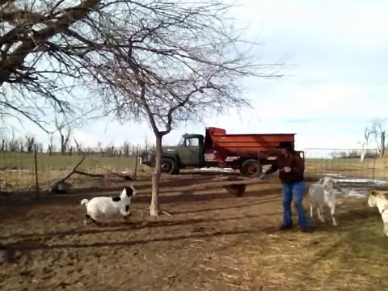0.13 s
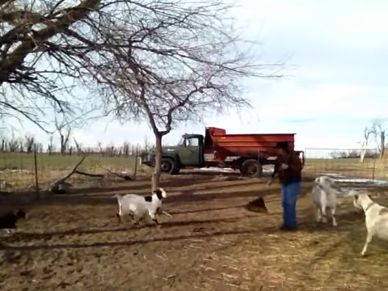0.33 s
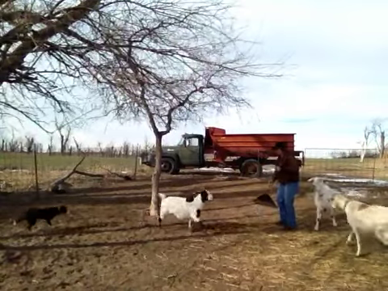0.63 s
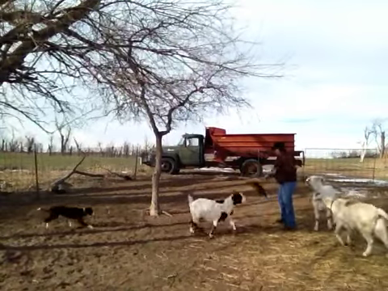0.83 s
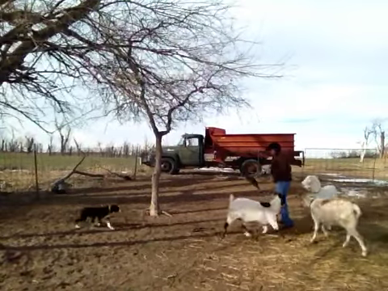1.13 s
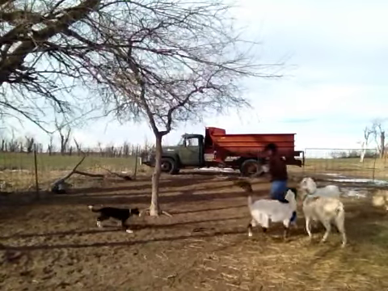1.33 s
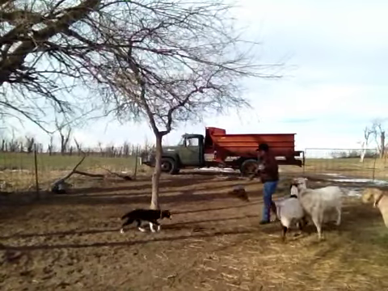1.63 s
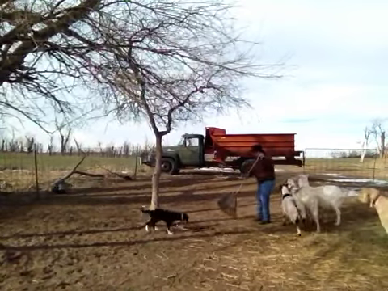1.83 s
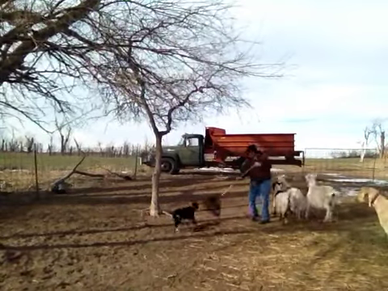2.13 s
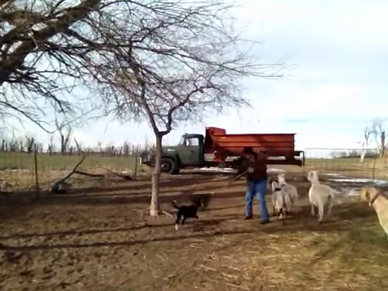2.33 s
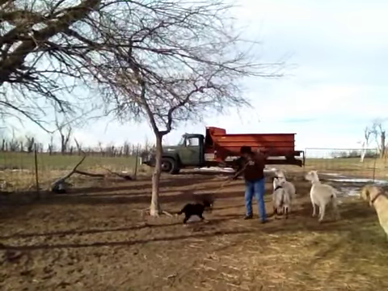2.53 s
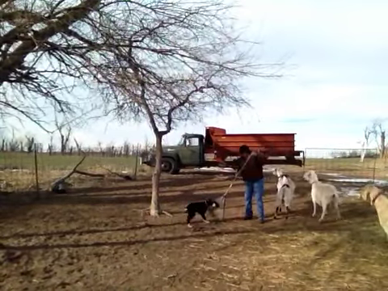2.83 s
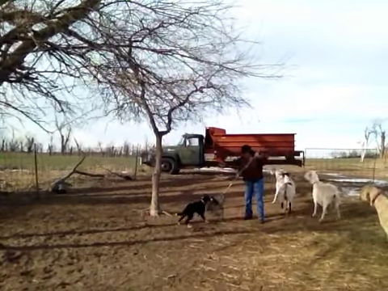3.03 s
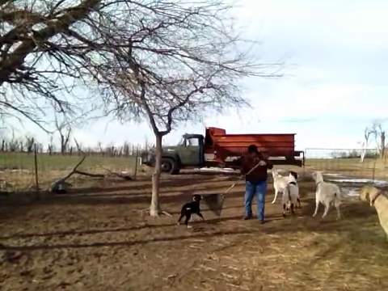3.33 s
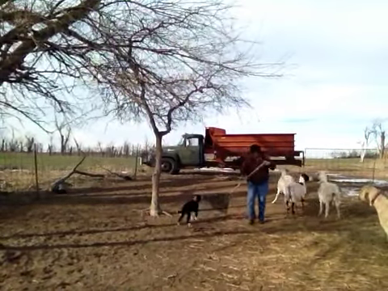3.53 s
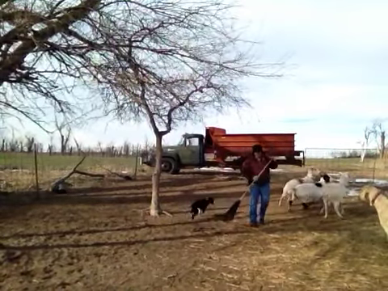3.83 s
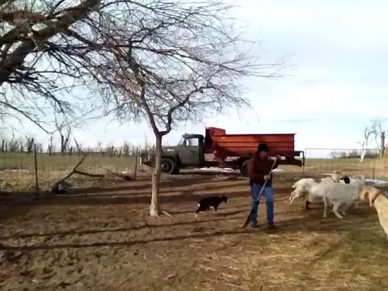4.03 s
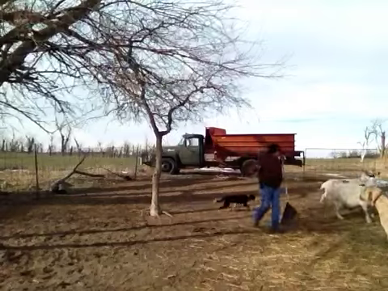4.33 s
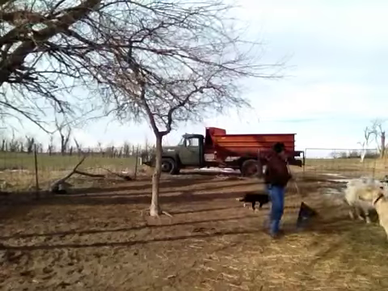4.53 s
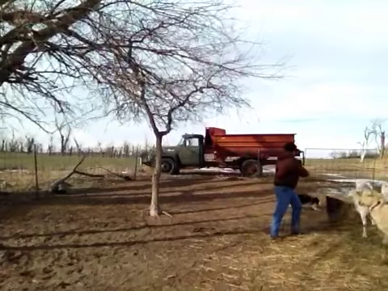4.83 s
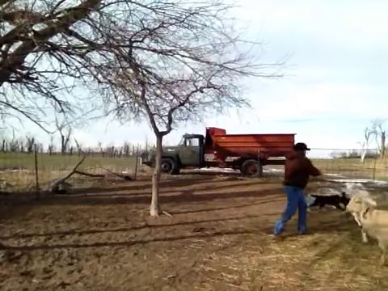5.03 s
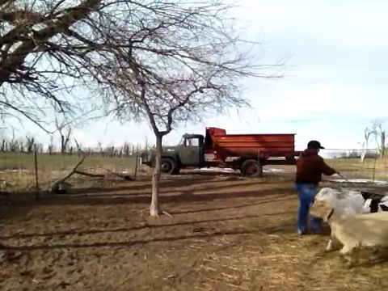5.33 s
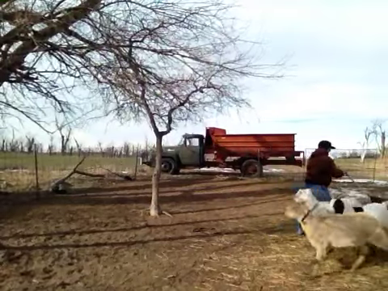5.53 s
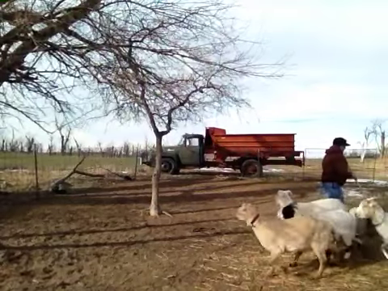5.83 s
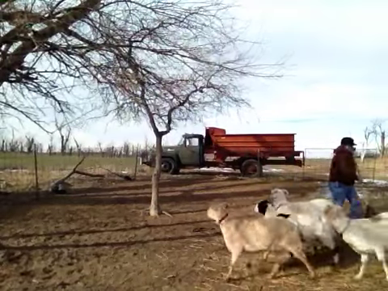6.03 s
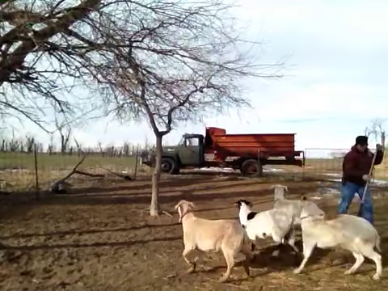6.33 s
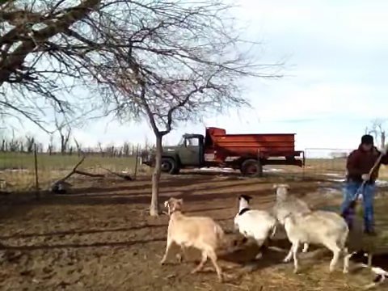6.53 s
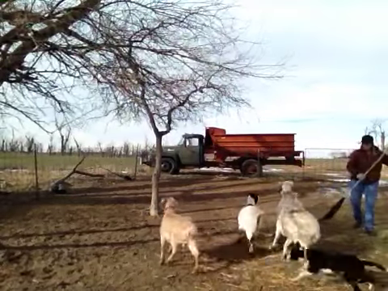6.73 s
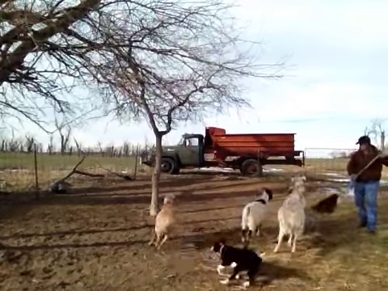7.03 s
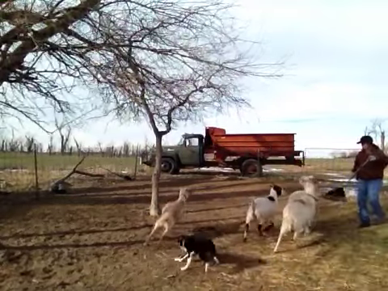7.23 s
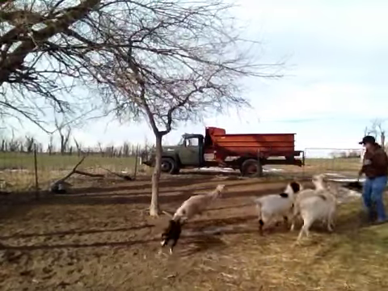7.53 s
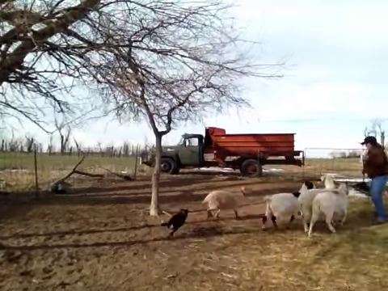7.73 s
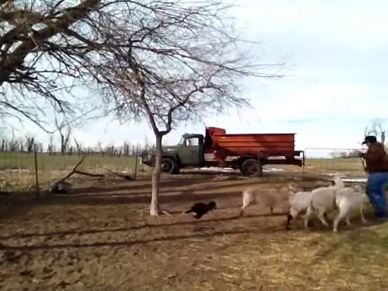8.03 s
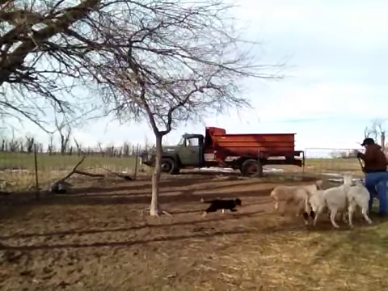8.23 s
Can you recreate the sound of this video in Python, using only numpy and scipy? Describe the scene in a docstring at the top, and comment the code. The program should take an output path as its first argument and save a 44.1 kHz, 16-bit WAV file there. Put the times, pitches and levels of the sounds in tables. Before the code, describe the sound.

Open-air hush and low, ragged wind run through the whole 8.4 seconds, gusts rumbling and fluttering on a single microphone. From the start, hooves rustle dry straw in bright crackles with scattered brittle snaps, including a sharp one near 2.1 s. Around 2.6 s a dull hoof scuff passes, then the straw thins and the wind briefly eases. From 3.2 to 3.8 s a bird gives five short, grainy rasps, followed by falling chirps at about 3.8 and 4.1 s, and a faint, thin whistle sliding down near 4.4-4.7 s. From 5.2 s the goats trot close: dense straw crackling, snaps, and gritty crunches on clods until about 7 s, with dirt scuffs around 6-7.2 s. The strongest gust slaps the microphone hard at 6.15 s. Trampling then lightens; a last faint whistle slides down around 7.4 s amid continuing wind and straw.

```python
"""Goats are herded round a dirt pen on a breezy day, heard through one microphone.
From the start, filtered noise gives open air and gusts, pressure pulses slap the microphone,
and showers of clicks make straw crackle and snap under the hooves. Hooves soon scuff dirt too.
Then a bird gives five rasps of grainy hiss, two falling chirps and a thin sliding whistle.
The herd trots close by, densest of all, and crunches clods; a last whistle slides down late on."""
import sys
import numpy as np
from scipy import signal
from scipy.fft import rfft, irfft, next_fast_len
from scipy.io import wavfile
from scipy.ndimage import uniform_filter1d

SR = 44100
rng = np.random.default_rng(int(sys.argv[2]) if len(sys.argv) > 2 else 0)


def wav_out(sig):
    """Save sig, one row per channel (or a flat mono array), as 16-bit PCM at SR to the path in sys.argv[1]."""
    wavfile.write(sys.argv[1], SR, np.round(np.clip(np.atleast_2d(sig).T, -1, 1) * 32767).astype(np.int16))


N = 369999
TIME = np.arange(N) / SR


def amp(db):
    """Level law: decibels to amplitude ratio."""
    return 10 ** (np.asarray(db) / 20)


def evened(x):
    """Normalization: scales a signal to rms 1."""
    return x / np.sqrt(np.mean(x ** 2) + 1e-20)


def curve(rows):
    """Linear interpolation: joins (t/s, value) rows by straight lines."""
    return np.interp(TIME, *np.transpose(rows))


def add(mix, s, sound):
    """Superposition: sums a sound into the mix from time s."""
    part = mix[max(round(s * SR), 0):][:len(sound)]
    part += sound[:len(part)]


def colour(x, spectrum, size=4096):
    """Minimum-phase filtering: a causal response of unit energy follows the shape of (f/Hz, level/dB) rows."""
    f, db = np.transpose(spectrum)
    hz = abs(np.fft.fftfreq(size, 1 / SR))
    log_gain = np.log(amp(np.interp(np.log(hz + 1), np.log(f), db)))
    # the Hilbert transform of the log gain supplies the minimum phase
    response = np.exp(np.conj(signal.hilbert(log_gain)))
    ring = np.fft.ifft(response).real[:size // 2]
    return signal.oaconvolve(x, ring / np.linalg.norm(ring))[:len(x)]


def wander(rate_hz):
    """Random modulation: noise of rms 1 under a Gaussian low-pass, down to 1/e in amplitude at rate_hz."""
    size = next_fast_len(N, True)
    hz = np.fft.rfftfreq(size, 1 / SR)
    spectrum = rfft(rng.standard_normal(size)) * np.exp(-(hz / rate_hz) ** 2)
    return evened(irfft(spectrum, size)[:N])


def steadied(x, span_s):
    """Power regulation: keeps the fine grain of x but holds its sliding mean power near 1."""
    window = signal.windows.hann(int(span_s * SR))
    power = signal.oaconvolve(x ** 2, window / window.sum(), "same")
    return x / np.sqrt(abs(power) + 1e-9)


def swells(rows, rise):
    """Power addition of uncorrelated sources: Gaussian swells, 10 dB down at both ends of their length.

    rise is the share of the length spent building up."""
    power = np.zeros(N)
    for s, length, db in rows:
        near = slice(max(int((s - 2 * length) * SR), 0), int((s + 2 * length) * SR))
        u = (TIME[near] - s) / length
        side = np.where(u < 0, rise, 1 - rise)
        power[near] += amp(db - 10 * (u / side) ** 2) ** 2
    return power


def grains(per_s):
    """Shot noise: clicks of random sign at random moments, a few of them large."""
    size = amp(4 * np.minimum(rng.exponential(1, N), 2.5))
    sign = rng.choice([-1., 1.], N)
    return size * sign * (rng.random(N) < per_s / SR)


def focused(material, centre_hz):
    """Resonant emphasis: a material's spectrum fades per octave away from the piece's own brightest pitch."""
    slope_db = 11  # per octave
    return [(hz, db - slope_db * abs(np.log2(hz / centre_hz))) for hz, db in material]


# spectral shape of the open air: (f/Hz, level/dB)
AIR_SPECTRUM = [(30, -3), (200, 28), (600, 13.5), (1800, 0), (3000, -4.5), (4000, -10.5), (7500, -11.5),
                (9800, -20), (15500, -17.5)]


def air(level_db=-47.0, fade_db_per_s=0.61):
    """Broadband noise: the soft rush of open fields, its level easing linearly in decibels."""
    level = level_db - fade_db_per_s * (TIME - TIME.mean())
    return amp(level) * colour(rng.standard_normal(N), AIR_SPECTRUM)


# gusts that drive both eddy sizes: (peak t/s, length t/s, driving level/dB)
GUST_ROWS = [(0.075, 0.26, -31), (0.522, 0.14, -25), (0.631, 0.064, -22.5), (0.69, 0.13, -23),
             (0.88, 0.52, -26), (1.168, 0.081, -25), (1.421, 0.25, -22), (1.412, 0.043, -21.5),
             (1.473, 0.044, -20.5), (1.587, 0.28, -28.5), (1.735, 0.082, -25.5), (1.844, 0.18, -24.5),
             (1.985, 0.1, -24), (2.092, 0.14, -29), (2.212, 0.093, -31), (2.508, 0.023, -28),
             (2.599, 0.19, -28), (2.794, 0.067, -25.5), (3.0, 0.96, -38.5), (3.412, 0.024, -32),
             (3.713, 0.29, -31), (3.883, 0.16, -25), (4.022, 0.07, -24.5), (4.121, 0.12, -30),
             (4.312, 0.11, -25.5), (4.53, 0.5, -25.5), (4.517, 0.049, -25), (4.708, 0.037, -24),
             (4.79, 0.088, -27.5), (4.92, 0.88, -33), (5.081, 0.05, -21), (5.382, 0.13, -30),
             (5.599, 0.21, -24), (5.809, 0.18, -23), (6.075, 0.34, -20.5), (6.172, 0.086, -17.5),
             (6.291, 0.23, -27.5), (6.515, 0.16, -33), (6.641, 0.029, -26.5), (6.94, 0.48, -31),
             (7.27, 0.22, -25.5), (7.541, 0.27, -30), (7.67, 0.17, -27), (7.718, 0.029, -21.5),
             (7.861, 0.22, -27.5), (8.005, 0.087, -25), (8.13, 0.4, -27.5)]
# spectral shape of the large rumbling eddies: (f/Hz, level/dB)
BUFFET_SPECTRUM = [(50, -61), (75, -22.5), (105, -10.5), (145, -1), (185, 1), (270, -7), (420, -18.5),
                   (700, -36), (2500, -76), (6000, -78)]
# spectral shape of the small ragged eddies: (f/Hz, level/dB)
FLUTTER_SPECTRUM = [(60, -52.5), (160, 6), (300, 8), (560, -4.5), (1300, -26), (2500, -45), (6000, -59.5)]
# extra level of the ragged flutter, highest in the gusts from about 2.6 to 4.3 s: (t/s, level/dB)
FLUTTER_TRIM = [(1.5, 1), (2.6, 3.5), (4.3, 2.7), (5.6, 0.5)]


def wind(breeze_db=-41, body_growth=0.88, flutter_db=-38.0, flutter_growth=1.4, lumpy_db=3.0, ragged_db=4.5):
    """Turbulent pressure: large eddies rumble; small ones grow faster with the gust and brighten it.

    Growths are in dB per dB of gust; the breeze is a steady driving power under the gusts."""
    gust_db = 10 * np.log10(amp(breeze_db) ** 2 + swells(GUST_ROWS, rise=.42))
    surge_db = gust_db - gust_db.mean()
    lumps = wander(rate_hz=42.0)

    body = steadied(colour(rng.standard_normal(N), BUFFET_SPECTRUM), span_s=.05)
    body = steadied(body * amp(lumpy_db * lumps), span_s=.28)
    rumble = body * amp(gust_db.mean() + body_growth * surge_db)

    churn = 2 * np.tanh(evened(lumps + wander(rate_hz=92)) / 2)  # soft limit on the raggedness
    ragged = rng.standard_normal(N) * amp(ragged_db * churn)
    flutter = steadied(colour(ragged, FLUTTER_SPECTRUM), span_s=.07)
    return rumble + flutter * amp(flutter_db + flutter_growth * surge_db + curve(FLUTTER_TRIM))


# spectral shape of dry straw, shared by rustle and snaps: (f/Hz, level/dB)
STRAW_SPECTRUM = [(500, -32), (2200, -18), (3100, -2.5), (3900, -5.5), (5000, -0.5), (6200, -1.5),
                  (7400, 3.5), (10000, -5), (11700, 2.5), (15000, -0.5)]
# bustle of the herd on the straw, loudest as it trots close by: (t/s, level/dB before the trim)
BUSTLE_CURVE = [(0.0, -72.5), (1.1, -69.5), (2.4, -71.5), (2.9, -76.5), (4.2, -75), (5.16, -70),
                (5.24, -64.5), (6.7, -65.5), (7.3, -70.5), (8.38, -69.5)]
# heavier footfalls that crush the straw: (peak t/s, length t/s, level/dB before the trim)
FOOTFALL_ROWS = [(0.35, 0.037, -61.5), (1.39, 0.039, -59.5), (1.625, 0.088, -61.5), (4.625, 0.15, -66),
                 (5.225, 0.096, -57.5), (5.325, 0.057, -57), (5.48, 0.22, -60), (5.675, 0.028, -61),
                 (6.09, 0.12, -62.5), (6.515, 0.22, -62), (6.66, 0.084, -56.5), (6.83, 0.062, -62.5),
                 (7.81, 0.049, -65.5), (8.08, 0.072, -66)]


def straw(level_db=7.0, clump_db=4.5, step_db=2.0, still_db=-76.0, rub=.6, tick=.22):
    """Crackling noise: stalks of many sizes crackle and tick over a soft rub, swelling with each footfall."""
    crackle, ticks, t = np.zeros(N), np.zeros(N), np.arange(SR // 50) / SR
    for hz in np.geomspace(5000, 15000, 5):  # one brightest pitch per stalk size
        stalk = focused(STRAW_SPECTRUM, hz)
        clumps = amp(clump_db * wander(rate_hz=59))
        crackle += colour(grains(per_s=450) * clumps, stalk)
        crack = rng.standard_normal(len(t)) * np.exp(-t / .0007)
        ticks += colour(signal.oaconvolve(grains(per_s=10), crack)[:N], stalk)
    rubbing = rub * colour(rng.standard_normal(N), STRAW_SPECTRUM)
    rustle = (evened(crackle) + rubbing) * amp(step_db * wander(rate_hz=18))
    # bustle weaker than still_db adds nothing
    bustle_power = np.maximum(amp(2 * curve(BUSTLE_CURVE)) - amp(2 * still_db), 0)
    press = np.sqrt(bustle_power + swells(FOOTFALL_ROWS, rise=.29))
    return (steadied(rustle, span_s=.25) + tick * evened(ticks)) * press * amp(level_db)


# eddies that slap the microphone: (t/s, peak level/dB before trim and high-pass)
SLAP_ROWS = [(0.075, -15), (4.559, -15.5), (5.094, -13), (6.148, -1.5), (6.282, -10), (7.688, -10),
             (8.015, -12.5)]


def slaps(width_s=0.00053, level_db=-6.0):
    """Pressure pulse: an eddy crossing the port makes a quick rounded dip, then its rebound."""
    out, t = np.zeros(N), np.arange(-SR // 100, SR // 100) / SR
    u = t / width_s
    push = np.sin(u) / np.cosh(u / 1.6) ** 2
    for s, db in SLAP_ROWS:
        add(out, s + t[0], amp(db + level_db) * push / push.max())
    return signal.sosfilt(signal.butter(2, 130, "highpass", fs=SR, output="sos"), out)


# stalks that snap under a hoof: (t/s, level/dB before the trim, brightest f/Hz)
SNAP_ROWS = [(0.3651, -39, 13900), (0.41, -39, 5590), (0.564, -34.5, 11000), (0.7248, -36.5, 11900),
             (0.7514, -36.5, 6250), (0.935, -38.5, 4460), (1.377, -37, 9500), (1.597, -34, 12000),
             (1.645, -38, 7310), (1.8685, -40, 9500), (1.94, -38, 11000), (2.082, -26.5, 14200),
             (4.947, -41, 11900), (5.067, -36, 6200), (5.213, -35, 12400), (5.6421, -36, 11300),
             (5.7233, -29, 11600), (5.839, -37, 7050), (5.866, -40, 8000), (5.943, -38, 6000),
             (6.022, -27, 8400), (6.676, -29, 11000), (6.684, -29, 10000), (6.742, -39, 8160),
             (7.159, -36.5, 7500), (7.2105, -39, 7450), (7.497, -30.5, 12100), (7.638, -49, 11900),
             (7.6943, -41, 7500), (7.744, -42, 11000), (8.061, -40, 8000), (8.275, -44, 7500)]


def snaps(level_db=-8.5, crack_s=0.0012, splinter_s=0.013, splinter=0.18):
    """Brittle fracture: a breaking stalk cracks in a fast-decaying burst with a few slower splinters."""
    out, t = np.zeros(N), np.arange(SR // 10) / SR
    for s, db, hz in SNAP_ROWS:
        splinters = splinter * np.exp(-t / splinter_s) * rng.exponential(1, len(t))
        burst = rng.standard_normal(len(t)) * (np.exp(-t / crack_s) + splinters)
        add(out, s, amp(db + level_db) * colour(burst, focused(STRAW_SPECTRUM, hz)))
    return out


def strokes(rows, spectrum, grain_db, grain_hz):
    """Amplitude modulation: short swells of hiss, grainy at random rates up to about grain_hz."""
    swell = np.zeros(N)
    for s, length, db in rows:
        add(swell, s - length / 2, amp(db) * signal.windows.tukey(int(length * SR), .8))
    grainy = rng.standard_normal(N) * amp(grain_db * wander(grain_hz))
    return swell * evened(colour(grainy, spectrum))


# spectral shape of dirt, shared by scuffs and clods: (f/Hz, level/dB)
DIRT_SPECTRUM = [(400, -28), (1500, 14), (3000, 11), (3900, 1.5), (5200, 2), (7600, 4), (15000, -5)]
# hooves scuffing dirt: (middle t/s, length t/s, level/dB, brightest f/Hz)
SCUFF_ROWS = [(2.635, 0.1, -62, 2780), (4.668, 0.12, -62, 3000), (5.96, 0.12, -57, 7000),
              (6.515, 0.069, -58, 6000), (6.98, 0.16, -55.5, 6000), (7.157, 0.15, -57, 7000)]


def scuffs():
    """Sliding friction: hooves drag through dirt, dull on packed ground and brighter on loose grit."""
    out = np.zeros(N)
    for s, length, db, hz in SCUFF_ROWS:
        out += strokes([(s, length, db)], focused(DIRT_SPECTRUM, hz), grain_db=4.0, grain_hz=250)
    return out


# the bird's rasps: (middle t/s, length t/s, level/dB)
RASP_ROWS = [(3.19, 0.16, -64.5), (3.35, 0.13, -63.5), (3.5, 0.12, -59), (3.65, 0.16, -58),
             (3.8, 0.24, -65)]
# spectral shape of a rasp: (f/Hz, level/dB)
RASP_SPECTRUM = [(1500, -29), (2600, -4), (3050, 6.5), (3900, -3), (5300, 0.5), (11000, -4.5), (15000, -13)]


def rasps():
    """Noise source: the rasping call is finely grained, filtered hiss."""
    return strokes(RASP_ROWS, RASP_SPECTRUM, grain_db=1.0, grain_hz=300)


def song(rows, waver, overtones_db=()):
    """Frequency modulation: a gliding tone wavers and flutters; pressed notes gain hoarse harmonics."""
    hoarse, flutter_db, break_db = .018, 1.2, 4  # hoarse and waver: rms share of the pitch
    s, *columns = np.transpose(rows)
    t = np.arange(s[0], s[-1], 1 / SR)
    hz, db, *press = (np.interp(t, s, c) for c in columns)
    jitter, shimmer, breaks = evened(uniform_filter1d(rng.standard_normal((3, len(t))), size=80))
    phase = 2 * np.pi * np.cumsum(hz * (1 + waver * jitter)) / SR
    tone = np.sin(phase)
    if press:
        rough = 2 * np.pi * np.cumsum(hz * (1 + hoarse * jitter)) / SR
        harmonics = sum(amp(level) * np.sin(k * rough) for k, level in enumerate(overtones_db, 2))
        tone = tone + amp(press[0]) * evened(amp(break_db * breaks)) * harmonics
    level = np.sqrt(2) * amp(db + flutter_db * shimmer)  # sqrt(2): a sine's peak over its rms
    return s[0], level * tone * signal.windows.tukey(len(t), .08)


# one table a chirp: (t/s, pitch f/Hz, level/dB, overtone level/dB)
CHIRP_TABLES = [
    [(3.762, 2003, -42.5, -28), (3.79, 2050, -41, -24), (3.809, 2030, -41.5, -10),
     (3.817, 1900, -31.5, -23), (3.824, 1846, -42, -12), (3.84, 1850, -34.5, -31), (3.88, 1860, -54, -28)],
    [(4.07, 1890, -48, -52), (4.078, 2033, -38.5, -53), (4.122, 2016, -34.5, -56),
     (4.132, 1860, -38.5, -34), (4.16, 1825, -52, -38)],
]


def chirps():
    """Harmonic series: falling tones whose overtones come and go with the press of the voice."""
    out = np.zeros(N)
    for rows in CHIRP_TABLES:
        add(out, *song(rows, waver=.003, overtones_db=(0.5, 0.0, -7, -24)))
    return out


# one table a thin whistle: (t/s, pitch f/Hz, level/dB)
WHISTLE_TABLES = [
    [(4.37, 7180, -73), (4.475, 6850, -71), (4.517, 5560, -63.5), (4.55, 5370, -64), (4.7, 5250, -71.5)],
    [(7.32, 6520, -73), (7.45, 6200, -70)],
]


def whistles():
    """Pure tone: thin whistles with no overtones slide down in pitch."""
    out = np.zeros(N)
    for rows in WHISTLE_TABLES:
        add(out, *song(rows, waver=.009))
    return out


def yard(x, echo_s=0.044, echo_db=-20):
    """Reverberation: quick scatter from ground and trees, one weak echo, and a diffuse far tail, all dulled."""
    near_t60, far_t60 = .1, .6  # s to decay by 60 dB
    far_db, wet_db, dull_hz = -5, -9, 3000
    t = np.arange(SR) / SR
    taps = rng.choice([-1., 1.], SR) * (rng.random(SR) < 2000 / SR) * (t > .008)
    tail = taps * (amp(-60 * t / near_t60) + amp(far_db - 60 * t / far_t60))
    wet = amp(wet_db) * signal.oaconvolve(x, tail / np.linalg.norm(tail))[:N]
    add(wet, echo_s, amp(echo_db) * x)
    return signal.sosfilt(signal.butter(1, dull_hz, fs=SR, output="sos"), wet)


def birds():
    """Direct and reflected sound: calls from the trees round the pen, with the yard's reply."""
    calls = rasps() + chirps() + whistles()
    return calls + yard(calls)


# hooves landing on hard clods: (t/s, level/dB before the trim)
KNOCK_ROWS = [(5.6032, -45), (5.941, -40), (6.25, -43), (6.53, -50), (6.9925, -41)]


def knocks(level_db=-9.0, crush_s=0.0066):
    """Impact and crushing: a hoof on a hard clod gives a short, gritty, decaying crunch."""
    out, t = np.zeros(N), np.arange(SR // 20) / SR
    for s, db in KNOCK_ROWS:
        grit = rng.laplace(size=len(t)) * np.exp(-t / crush_s)
        add(out, s, amp(db + level_db) * colour(grit, DIRT_SPECTRUM))
    return out


def scene():
    """Superposition: open air, wind, herd and birds sum at one microphone."""
    hooves = straw() + snaps() + scuffs() + knocks()
    return (air() + wind() + slaps() + hooves + birds())[None]


def record(dry, edge_hz=15520):
    """Band limiting: a linear-phase low-pass sets the recorder's upper edge."""
    lowpass = signal.firwin(511, edge_hz, window=("kaiser", 9), fs=SR)
    return signal.oaconvolve(dry, lowpass[None], "same")


dry = scene()
out = record(dry)
wav_out(out)
```